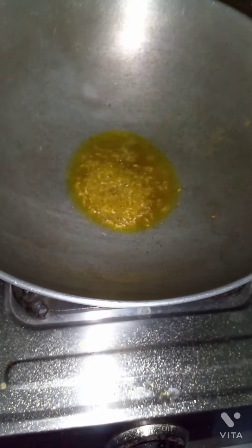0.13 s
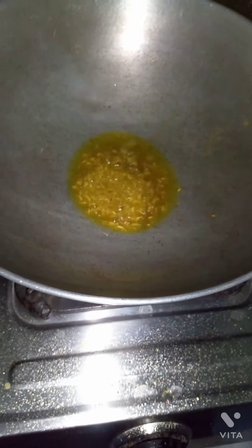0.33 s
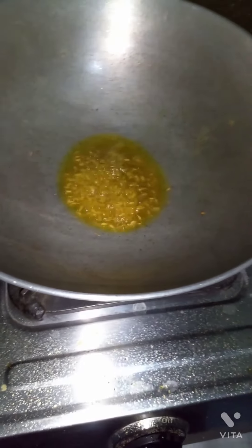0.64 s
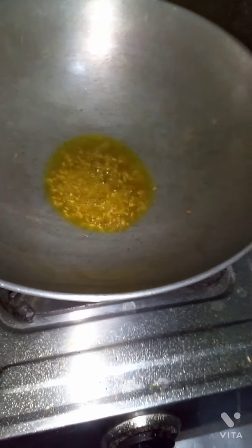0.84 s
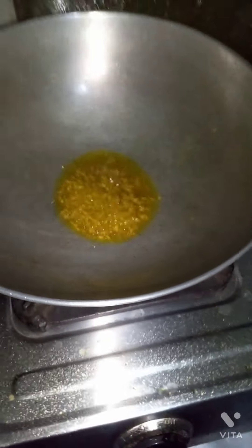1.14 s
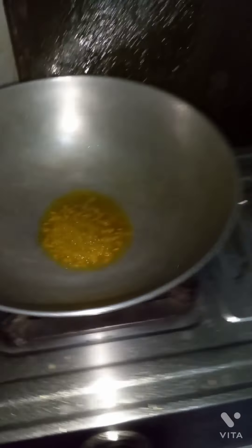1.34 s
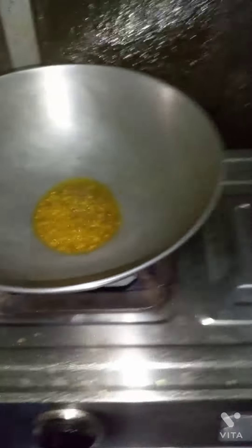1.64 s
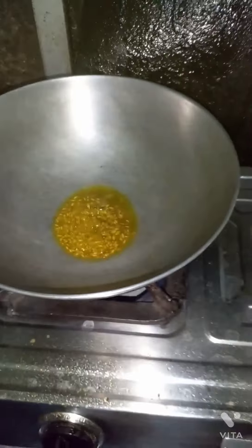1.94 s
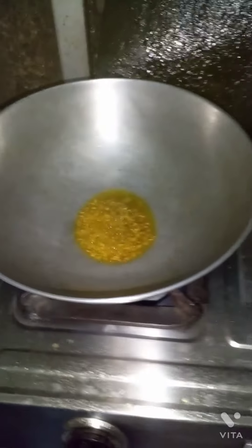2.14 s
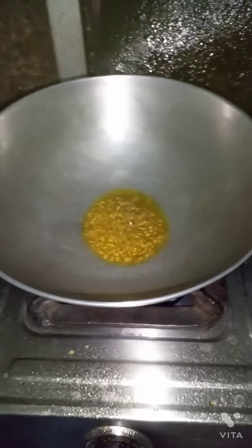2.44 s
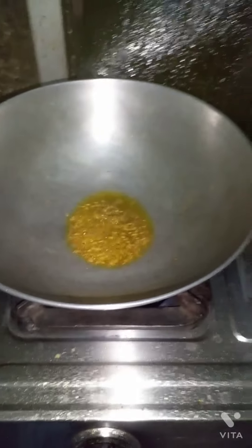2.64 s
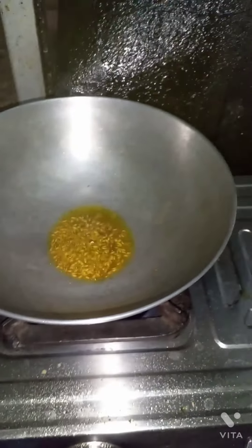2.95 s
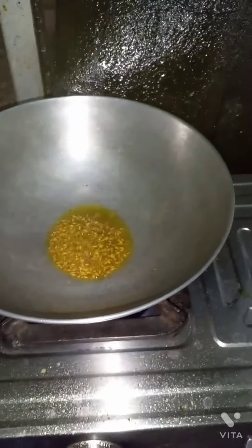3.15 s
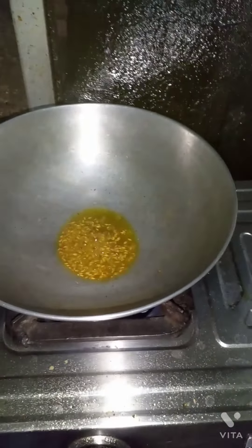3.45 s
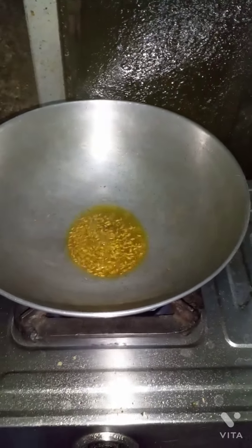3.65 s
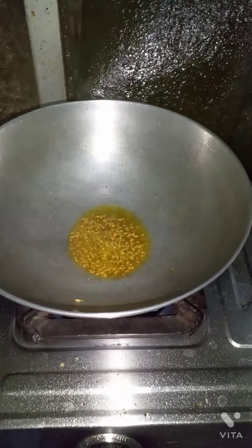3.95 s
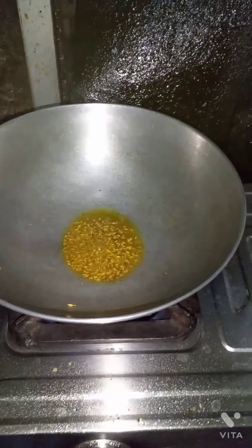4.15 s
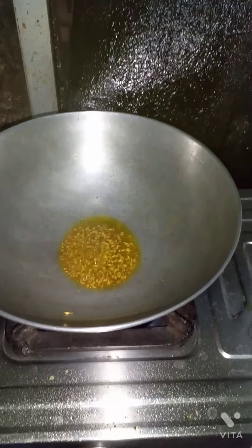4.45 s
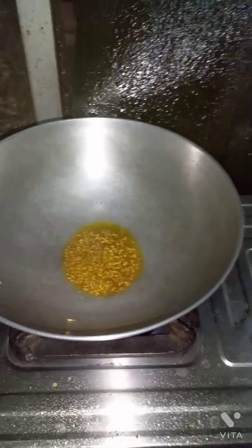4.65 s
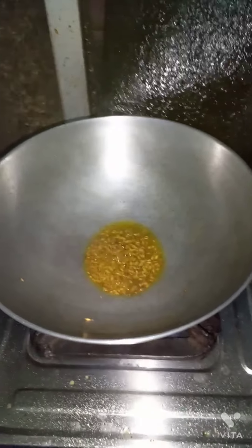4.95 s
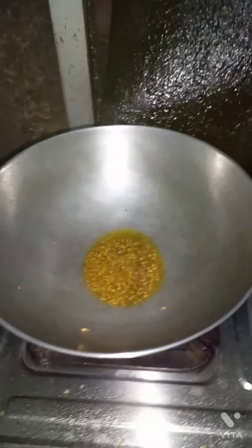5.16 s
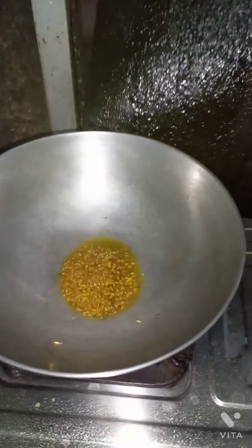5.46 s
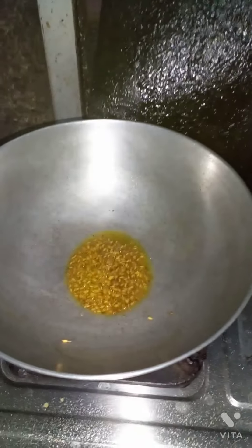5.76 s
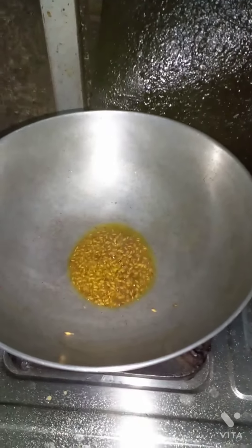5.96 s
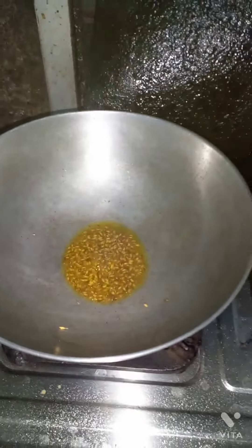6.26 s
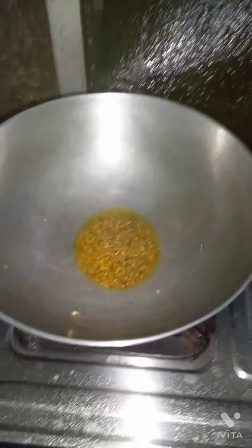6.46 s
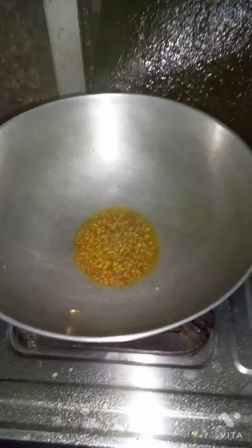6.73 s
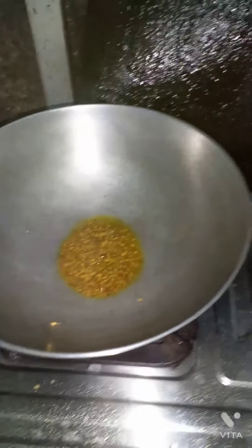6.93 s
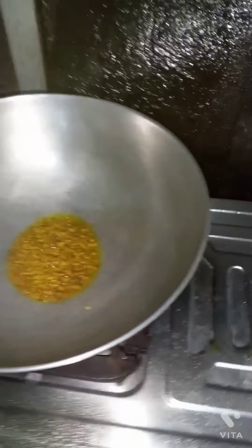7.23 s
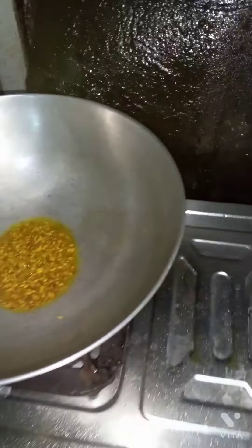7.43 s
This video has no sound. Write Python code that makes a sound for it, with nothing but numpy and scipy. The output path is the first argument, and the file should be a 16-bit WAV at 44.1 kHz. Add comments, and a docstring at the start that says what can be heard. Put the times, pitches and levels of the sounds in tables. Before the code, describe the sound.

Close above a metal wok in a hard-walled kitchen, seeds pop and crackle unevenly in hot oil from start to finish. Bright snaps, tiny hissing spits and bursting bubbles come singly and in clusters, and one dry droplet tick stands out early on. A fine, light sizzle rises and falls behind them, while the gas burner keeps up a quiet, low roar and hum.

```python
"""Cumin seeds pop as they fry in a little hot oil, in a metal wok on a gas ring.
Their husks crack open with a thin spit of steam, and bubbles burst with a short ring.
The wok colours each pop, and the hard kitchen walls draw it out with echoes.
Two droplets tick down close by, and later two loud pops are each followed by a sharp echo click.
Underneath, tiny bubbles sizzle and the flame flutters with a low roar."""
import sys
import numpy as np
from scipy import signal
from scipy.fft import rfft, irfft, next_fast_len
from scipy.io import wavfile
from scipy.ndimage import uniform_filter1d

SR = 44100
rng = np.random.default_rng(int(sys.argv[2]) if len(sys.argv) > 2 else 0)


def pcm_store(signal):
    """Save signal as 16-bit PCM."""
    levels = np.round(np.clip(np.atleast_2d(signal), -1, 1) * 32767)
    wavfile.write(sys.argv[1], SR, levels.astype(np.int16).T)


N = 335005
TAIL_SAMPLES = 16384   # length of one pop with its echoes

# Husks cracking open. Each row: start in seconds, snap level in dB,
# brightness in dB per octave, level of the steam spit in dB.
CRACKS = [(0.0, -3.5, -3, -13), (0.089, -15, 2.5, -9), (0.1924, -12, 2.5, -10), (0.2092, -10.5, -5.5, -9),
          (0.4963, -2.5, -2, 4), (0.5266, -5, -4, -10), (0.55, -3, -2, -12), (0.624, -11, -2.4, -11),
          (0.6432, -5, -4, -18), (0.6834, 3, -1, -6), (1.05, -14, -3, -12), (1.094, -5.5, -2.5, -10),
          (1.1314, 1.5, 1.2, -4), (1.2995, -2.5, 1, -6), (1.335, -3.5, -1.7, 3), (1.7453, -4.5, -0.5, 9.5),
          (2.04, -9.5, -3.5, -14), (2.071, 4, 1, 8), (2.2801, -10, -3, -17), (2.5521, 2, -0.5, 9.5),
          (2.6227, -4, 1, 5.5), (2.6937, -14, -5.5, -5), (2.8292, -10, -4.5, -4), (3.1469, -6.5, -3, -11),
          (3.3445, -1.5, -1.5, -12), (3.406, 5.5, 0, 13), (3.451, -2.5, -2.5, -14), (3.639, 2, -1, 11.5),
          (3.7146, -1, 0, -8), (3.7682, -1.5, -4.5, 6), (3.9722, -8, 0.5, -8), (4.0681, -6, -3.5, -21),
          (4.2008, -4, 0, -1), (4.366, -8, -2, -3), (4.408, -12, -3, -10), (4.4595, -4, -0.5, 10.5),
          (4.488, -4, -1, -10), (4.566, -2.5, -4, -14), (4.8811, -4, -1.5, -11), (4.9028, -1.3, -1.5, 8),
          (4.9847, -0.5, -2, 7), (5.076, -10.5, -2.5, -23), (5.26, -4, -1, -10), (5.3202, 1, -1.6, 8),
          (5.3625, -0.5, -1.3, 7.5), (5.5003, 3.5, 1.2, -7), (5.5336, 3.5, -1.5, 8),
          (5.7032, -4.5, -1.4, -16), (5.7649, -15, 1, -9), (5.831, -1.2, -5, 7), (5.8541, 3, -0.5, -1),
          (6.0557, -4, -1, 5.5), (6.1748, -0.5, 2, -2), (6.2894, -13.5, 2.5, -14),
          (6.3701, -6.5, -0.4, -13), (6.4083, -23, -7, -5), (6.5213, -3, -1, 1), (6.5734, -2.5, 1.7, 4.5),
          (6.7453, -3.5, -0.4, 5), (6.8505, -14.5, -2.5, -14), (7.1115, -4.5, 1.5, -19),
          (7.2151, -7.5, 0, 1), (7.3828, -0.3, 1, -5), (7.427, -2, -2, -5), (7.4832, -2, -2.5, 10)]

def husk_cracks(spit_hz=14500, spit_q=2.14):
    """Each husk splits with a snap and lets out a thin, high spit of steam."""
    out, hz = np.zeros(N), bins(TAIL_SAMPLES)
    spit = burst_ring(hz, spit_hz, spit_q)
    for start, snap_db, tilt_db, spit_db in CRACKS:
        add(out, start, from_db(snap_db) * in_kitchen(snap(hz, tilt_db)))
        add(out, start, from_db(spit_db) * in_kitchen(spit))
    return out


# The tone of a snap before it is tilted. Each row: frequency in Hz, level in dB.
SNAP_COLOUR = [(150, -22.5), (500, -14.5), (900, -10.5), (1150, -14), (1700, -8.5), (2050, -6.5),
               (2700, -6), (3800, -2.5), (4800, 1.5), (7000, 0), (10000, 1), (13300, 5), (15700, -1.5)]

def snap(hz, tilt_db, pivot_hz=5000):
    """A sudden break holds all pitches at once; tilt_db per octave makes it brighter or duller."""
    octaves = np.log2(np.maximum(hz, pivot_hz / 10) / pivot_hz)
    return causal(colour(SNAP_COLOUR, hz) * from_db(tilt_db * octaves))


# Big steam bubbles bursting. Each row: start in seconds, ring level in dB, pitch in Hz,
# relative sharpness (a sharper ring lasts more cycles).
BUBBLES = [(0.0888, -5, 4550, 1.8), (0.1074, -2.5, 6060, 3), (0.125, -11, 1400, 0.36),
           (0.1928, -1, 4830, 2.7), (0.3451, -10, 4200, 0.45), (0.4462, -12.5, 2560, 1.2),
           (0.5253, -3, 3430, 0.84), (0.6833, 2.5, 6390, 1.1), (0.811, -7, 6150, 0.95),
           (0.986, -7.5, 4350, 0.57), (1.074, -9, 5130, 1.9), (1.1312, 10.5, 4140, 0.9),
           (1.2143, 2.5, 4400, 1.04), (1.2753, 8, 5330, 0.94), (1.3633, 5.5, 3450, 0.77),
           (1.592, -14.5, 2250, 1.5), (1.6465, -8, 9400, 1.7), (1.8271, 7, 4140, 0.98),
           (1.881, -2.2, 1110, 0.66), (1.9734, -5.5, 5900, 2.9), (2.07, -5, 950, 0.4),
           (2.1068, 4.5, 2480, 2), (2.4368, -15, 2150, 0.33), (2.4835, -11.5, 4500, 0.79),
           (2.508, -7, 5430, 0.49), (2.8293, -4.5, 4200, 0.99), (2.9013, -3.5, 4370, 1.23),
           (2.9329, -3, 2560, 1.1), (2.966, -2.5, 2570, 2.6), (3.1601, 11.5, 3830, 0.86),
           (3.2742, 0.5, 4130, 1), (3.3452, 4.5, 5700, 1.04), (3.5174, 1, 3080, 0.72),
           (3.713, 5, 4220, 0.6), (3.7763, 10.5, 4800, 0.98), (3.951, -10.5, 5130, 0.48),
           (4.231, 2.5, 4500, 1.34), (4.3353, 5.5, 4870, 0.84), (4.615, -3.5, 4360, 1.1),
           (4.6386, 1.5, 5200, 1.76), (4.7237, -8, 5540, 0.6), (4.7501, 6, 4330, 0.73),
           (4.812, 10, 3250, 1.35), (4.8797, 6.5, 3850, 1.05), (5.1811, 7.5, 3630, 1.92),
           (5.2362, 2, 4700, 0.83), (5.26, 5, 5600, 1.4), (5.3203, 9, 3670, 2.9), (5.4689, 3, 4220, 1.6),
           (5.6554, -9.5, 830, 1.3), (5.7655, -1.7, 680, 0.79), (5.88, 1, 5530, 1.9),
           (6.0106, 8, 4470, 1.58), (6.3325, -10, 7100, 2.1), (6.5215, 3, 5940, 5.3),
           (6.6155, 7.5, 4750, 1.67), (6.904, 4.5, 5500, 1.9), (7.1109, 0, 8600, 1.2),
           (7.18, -6.5, 4760, 0.66), (7.234, 7, 4600, 2.7), (7.4262, -1, 5400, 1),
           (7.5893, -0.5, 5650, 1.3)]

def bubbles(narrowing=1.2):
    """A bubble's skin tears with a dull snap, then its hollow rings: the smaller, the higher."""
    out, hz = np.zeros(N), bins(TAIL_SAMPLES)
    skin = snap(hz, tilt_db=-3)
    for start, ring_db, pitch_hz, sharpness in BUBBLES:
        skin_db = ring_db - 12.5 - 4.5 * np.log2(sharpness)   # longer ring, weaker snap
        ring = burst_ring(hz, pitch_hz, sharpness * narrowing)
        add(out, start, from_db(skin_db) * in_kitchen(skin))
        add(out, start, from_db(ring_db) * in_kitchen(ring))
    return out


def burst_ring(hz, centre_hz, q, damping=1.7):
    """Two linked resonators pass a rounded band of pitches and little on either side."""
    detuning = q * (hz / centre_hz - centre_hz / hz)
    return 1 / (1 + 1j * damping * detuning - detuning ** 2)


# How loud the froth is. Each row: time in seconds, fine froth in dB, coarse froth in relative dB.
SIZZLE_LEVELS = [(0.0, -49.5, -53.5), (0.48, -47.5, -59), (0.6, -60, -60), (0.96, -49, -58),
                 (1.3, -56, -56), (1.48, -48.5, -62.5), (1.96, -49.5, -60.5), (3.16, -50.5, -59),
                 (3.3, -45, -54), (4.12, -49.5, -62.5), (4.92, -46, -52), (5.08, -51, -66),
                 (5.44, -45, -58), (5.56, -49, -56.5), (6.92, -54.0, -72), (7.38, -50, -69),
                 (7.58, -48.5, -69)]
# The tone of the sizzle. Each row: frequency in Hz, level in dB.
SIZZLE_COLOUR = [(290, -21), (500, -6), (891, -9.5), (1110, -12), (1190, -12.5), (2280, -12), (3220, -11.5),
                 (4180, -5.5), (6740, -6.5), (14100, -6), (15800, -3)]

def sizzle(bursts_per_s=130, low_hz=2400, high_hz=14000, pitches=8, split_hz=3200):
    """Many tiny bubbles of mixed sizes burst over a smooth hiss of escaping steam."""
    bursts, hz = np.zeros(N), bins(TAIL_SAMPLES)
    for pitch_hz in np.geomspace(low_hz, high_hz, pitches):
        strengths = from_db(3 * np.minimum(rng.exponential(1, N), 3))
        clicks = strengths * (rng.random(N) < bursts_per_s / pitches / SR)
        pop = in_kitchen(resonance(hz, pitch_hz, q=0.86))
        bursts += signal.oaconvolve(clicks, pop)[:N]
    hiss = from_db(-0.5) * rng.standard_normal(N)
    froth = filtered(unit_rms(bursts) + hiss, lambda hz: colour(SIZZLE_COLOUR, hz))
    # fine (high) and coarse (low) froth come and go separately
    fine = signal.sosfilt(signal.butter(3, split_hz, "high", fs=SR, output="sos"), froth)
    coarse = signal.sosfilt(signal.butter(3, split_hz, "low", fs=SR, output="sos"), froth)
    fine_db, coarse_db = in_time(SIZZLE_LEVELS)
    return from_db(fine_db) * unit_rms(fine) + from_db(coarse_db - 2.5) * unit_rms(coarse)


# Short dry ticks: two droplets, then two echo clicks. Each row: start in seconds, level in dB.
TICKS = [(1.767, -3.5), (1.797, -25), (3.17, -23), (3.7765, -22)]
# The ring of a tick. Each row: pitch in Hz, width in Hz, relative level in dB.
TICK_MODES = [(3080, 200, 4), (4700, 280, 13), (5500, 580, 6), (8800, 1500, 8.5), (12000, 4500, 9)]

def dry_ticks(room_db=-7.0, low_cut_hz=1500):
    """Two droplets land close by; later, two sharp echo clicks come just after loud pops."""
    out, hz = np.zeros(N), bins(TAIL_SAMPLES)
    tick = ringing(hz, TICK_MODES) / (1 + low_cut_hz / (1j * hz))
    for start, db in TICKS:
        room = from_db(room_db) * in_kitchen(tick)
        add(out, start, from_db(db) * (irfft(tick) + room))
    return out


# How loud the flame roars. Each row: time in seconds, relative level in dB.
ROAR_LEVELS = [(0.0, -53.5), (0.7, -52), (1.02, -54.5), (3.1, -56), (3.4, -52), (4.0, -62), (4.14, -55.5),
               (5.4, -56), (5.58, -58), (5.82, -55), (6.2, -56.5), (6.42, -53.5), (7.28, -57.5),
               (7.58, -50.5)]
# The tone of the roar. Each row: frequency in Hz, level in dB.
ROAR_COLOUR = [(20, -34), (45, -23), (85, -16.5), (135, 0.5), (155, 0), (200, 2), (290, 2.5), (345, 0.5),
               (450, -8.5), (650, -23.5), (1200, -23), (4000, -21.5)]

def flame_roar():
    """The swirling gas flame makes a soft, low rush of noise."""
    roar = filtered(rng.standard_normal(N), lambda hz: colour(ROAR_COLOUR, hz))
    return from_db(in_time(ROAR_LEVELS)[0] + 0.5) * unit_rms(roar)


# The flame's deep drone, throb and hum. Each row: pitch in Hz, rough width in Hz, level offset in dB.
FLAME_MODES = [(65.5, 6.8, -0.5), (117, 11.3, 0), (234.1, 5.3, -3)]
# How each of the three swells and fades. Each row: time in seconds, relative level in dB.
DRONE_LEVELS = [(0.0, -68), (0.12, -57), (0.66, -71), (0.88, -62), (1.66, -74.0), (1.76, -65.0),
                (2.94, -71), (3.12, -61), (3.62, -73), (4.06, -64), (5.08, -74), (5.22, -60.0), (5.44, -67),
                (5.82, -63), (6.2, -75), (6.4, -57.5), (6.6, -63.5), (7.58, -57.5)]
THROB_LEVELS = [(0.0, -55), (0.08, -55.5), (0.52, -54), (0.64, -70), (0.9, -53), (1.28, -60.5),
                (2.82, -60.5), (3.1, -66.5), (3.28, -51), (3.42, -65), (4.64, -60), (4.86, -47),
                (5.0, -62.5), (5.22, -45), (5.62, -72), (5.7, -60.5), (7.46, -57), (7.58, -54)]
HUM_LEVELS = [(0.0, -68), (0.48, -62), (1.5, -67), (1.94, -61), (2.16, -73), (2.26, -56.5), (3.06, -68),
              (3.26, -55.5), (3.74, -56), (3.82, -61.5), (4.58, -52), (4.7, -68), (6.12, -67.5), (6.9, -58),
              (7.24, -63), (7.58, -58)]

def flame_tones(drone_boost_db=0.5):
    """The flame keeps three low resonances going, each rising and falling by itself."""
    out = np.zeros(N)
    swells = in_time(DRONE_LEVELS)[0] + drone_boost_db, in_time(THROB_LEVELS)[0], in_time(HUM_LEVELS)[0]
    for (pitch_hz, width_hz, db), swell_db in zip(FLAME_MODES, swells):
        out += from_db(db + swell_db) * low_tone(pitch_hz, width_hz)
    return out


def low_tone(pitch_hz, width_hz, even_s=0.25):
    """Swirling gas rings one narrow resonance; slow changes in its loudness are evened out."""
    q = pitch_hz / width_hz / 2
    tone = unit_rms(filtered(rng.standard_normal(N), lambda hz: resonance(hz, pitch_hz, q) ** 2))
    slow_power = uniform_filter1d(tone ** 2, int(even_s * SR))
    return unit_rms(tone / np.sqrt(slow_power + 0.062))


# The resonances of the wok's bowl. Each row: pitch in Hz, width in Hz, relative level in dB.
BOWL_MODES = [(745.6, 4.6, 5.5), (927, 11, 1), (1452, 104, -8), (2089, 118, 2), (2282, 14, 5.5),
              (2600, 63, -5), (2870, 8.3, -27), (3330, 9.4, 2), (4250, 45, -9), (5200, 340, -18)]

def wok(sound, gain_db=0.36):
    """The metal bowl adds a hollow ring to everything that pops in it."""
    return from_db(gain_db) * filtered(sound, lambda hz: 1 + ringing(hz, BOWL_MODES))


# The pops happen close together, so they share part of their echo pattern.
SHARED_ECHOES = rng.standard_normal(TAIL_SAMPLES)

def in_kitchen(spectrum, fade_60db_s=0.28, ceiling_delay_s=0.011, shared=0.14):
    """Turn a pop's spectrum into sound that arrives directly and off the bowl, ceiling and walls."""
    t = np.arange(TAIL_SAMPLES) / SR
    walls = from_db(-60 * t / fade_60db_s)
    bowl = from_db(9) * np.exp(-t / 0.00036)
    # the bowl throws sound upwards, so the ceiling sends a strong echo back
    since_ceiling = t - ceiling_delay_s - rng.uniform(-0.0005, 0.0008)
    ceiling = from_db(6) * np.exp(-np.abs(since_ceiling) / 0.0014) * (since_ceiling > 0)
    envelope = np.sqrt(walls ** 2 + bowl ** 2 + ceiling ** 2)
    pattern = np.sqrt(shared) * SHARED_ECHOES + np.sqrt(1 - shared) * rng.standard_normal(TAIL_SAMPLES)
    # early echoes are few and uneven, later ones merge into smooth noise
    unevenness = np.log(from_db(5.5)) * np.exp(-t / 0.014)
    lumps = np.repeat(np.clip(rng.standard_normal(TAIL_SAMPLES // 16), -2, 2), 16)
    echoes = pattern * envelope * np.exp(unevenness * lumps - unevenness ** 2)
    echoes /= np.linalg.norm(echoes)
    # the straight path and the first ceiling bounce arrive as clean clicks
    echoes[0] = from_db(-18.5)
    echoes[np.argmax(since_ceiling > 0)] = from_db(-31)
    echoes /= np.linalg.norm(echoes)
    return irfft(spectrum * rfft(echoes))


def resonance(hz, centre_hz, q):
    """How a ringing object answers each frequency; a higher q rings longer."""
    return 1 / (1 + 1j * q * (hz / centre_hz - centre_hz / hz))


def ringing(hz, modes):
    """Several resonances of one object, added together."""
    return sum(from_db(db) * resonance(hz, pitch, pitch / width) for pitch, width, db in modes)


def colour(points, hz):
    """Read a tone table as a gain at each frequency."""
    point_hz, point_db = np.transpose(points)
    return from_db(np.interp(np.log(hz), np.log(point_hz), point_db))


def causal(gain):
    """A filter with this gain in which nothing sounds before its cause (minimum phase)."""
    cepstrum = irfft(np.log(gain + 1e-6))
    half = len(cepstrum) // 2
    return np.exp(rfft(np.r_[cepstrum[0], 2 * cepstrum[1:half], np.zeros(half)]))


def filtered(sound, response):
    """Shape a sound with a response given as a function of frequency."""
    size = 2 * next_fast_len(N // 2 + TAIL_SAMPLES)
    return irfft(rfft(sound, size) * response(bins(size)))[:N]


def bins(size):
    """The frequencies in Hz of a spectrum of that many samples."""
    return np.maximum(np.arange(size // 2 + 1) * SR / size, 1)


def in_time(rows):
    """Join a table's points into one curve over time for each level column."""
    seconds, *columns = np.transpose(rows)
    return [np.interp(np.arange(N) / SR, seconds, column) for column in columns]


def from_db(db):
    """Turn decibels into a gain."""
    return 10 ** (np.asarray(db) / 20)


def unit_rms(sound):
    """Scale a sound to an average power of 1."""
    return sound / np.sqrt(np.mean(sound ** 2) + 1e-20)


def add(out, start_s, sound):
    """Mix a sound in at its start time."""
    start = round(start_s * SR)
    part = sound[:max(N - start, 0)]
    out[start:start + len(part)] += part


def scene():
    """One microphone above the wok feeds both channels alike."""
    frying = wok(husk_cracks() + bubbles() + sizzle())
    sound = frying + dry_ticks() + flame_roar() + flame_tones()
    return np.array([sound, sound])


def record(dry, cutoff_hz=15900):
    """Cut off the very highest treble steeply."""
    return signal.sosfilt(signal.ellip(12, 0.1, 80, cutoff_hz, fs=SR, output="sos"), dry)


dry = scene()
out = record(dry)
pcm_store(out)
```